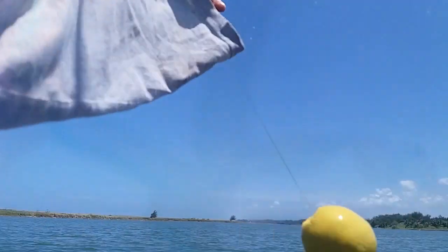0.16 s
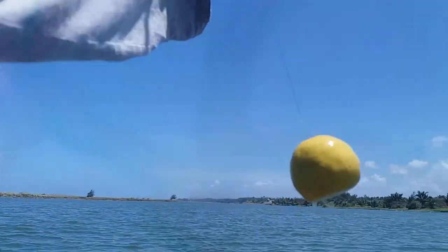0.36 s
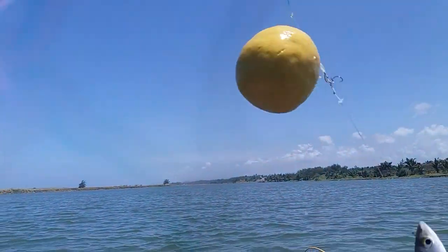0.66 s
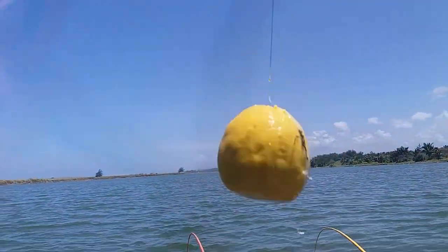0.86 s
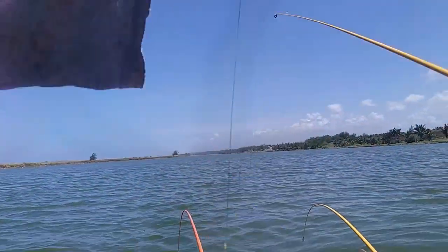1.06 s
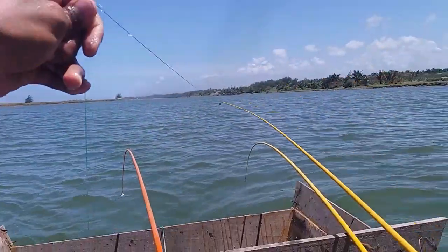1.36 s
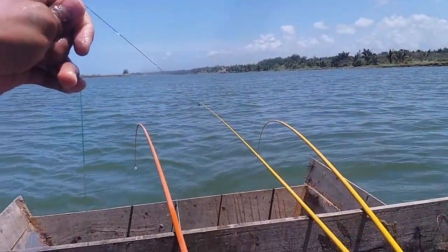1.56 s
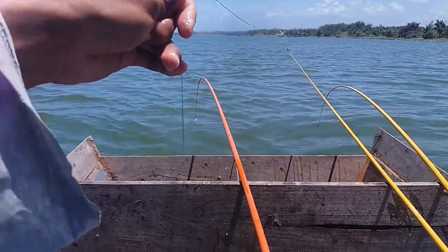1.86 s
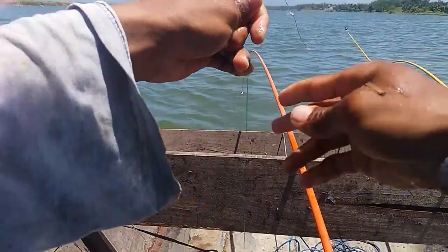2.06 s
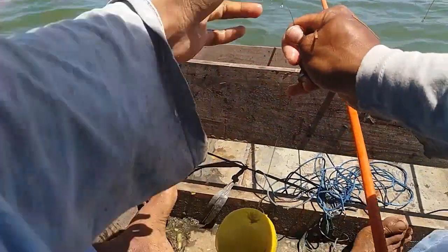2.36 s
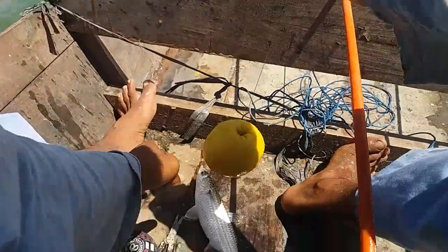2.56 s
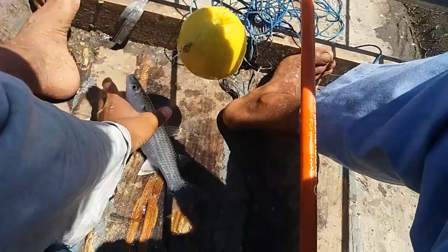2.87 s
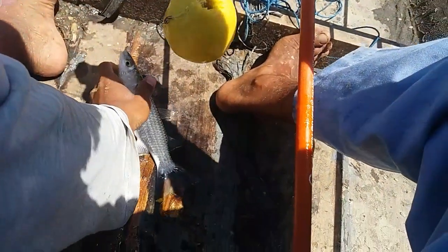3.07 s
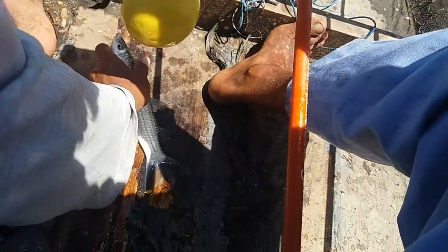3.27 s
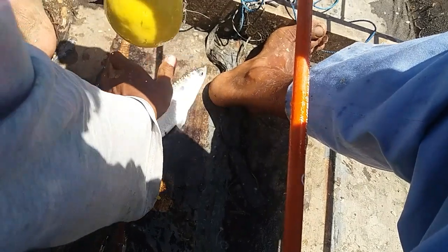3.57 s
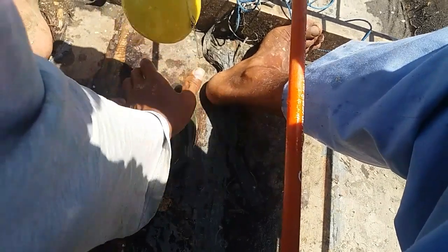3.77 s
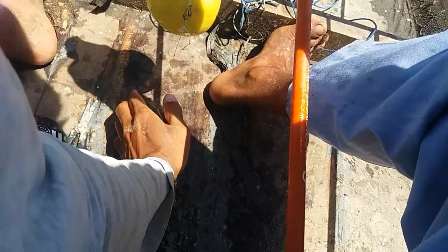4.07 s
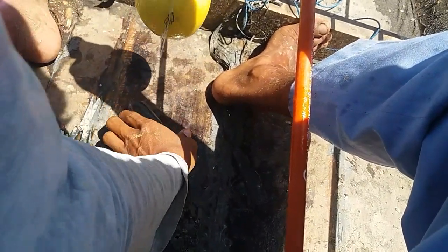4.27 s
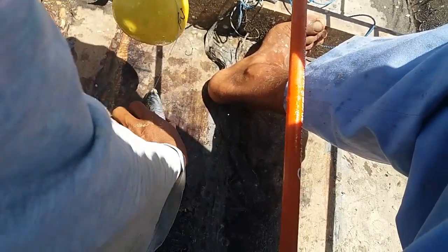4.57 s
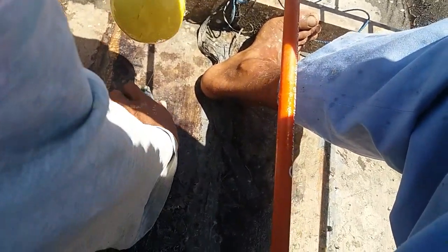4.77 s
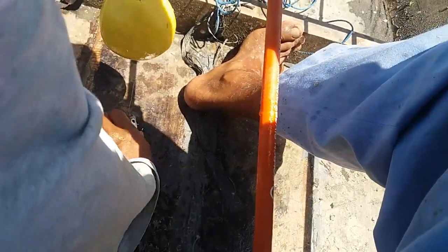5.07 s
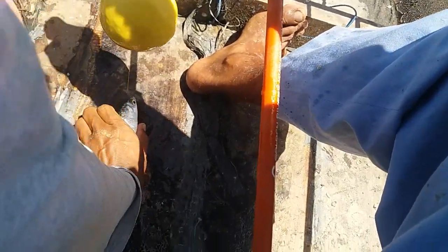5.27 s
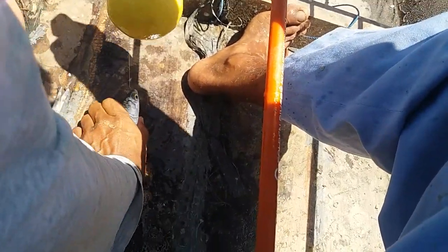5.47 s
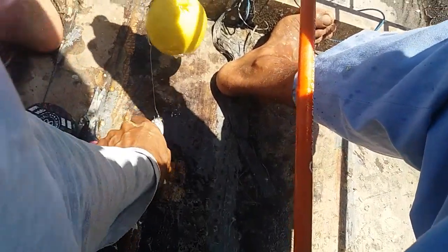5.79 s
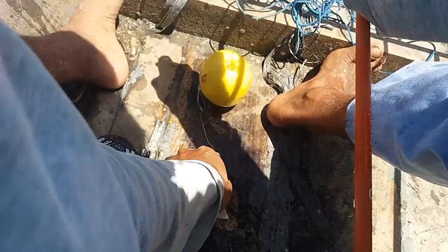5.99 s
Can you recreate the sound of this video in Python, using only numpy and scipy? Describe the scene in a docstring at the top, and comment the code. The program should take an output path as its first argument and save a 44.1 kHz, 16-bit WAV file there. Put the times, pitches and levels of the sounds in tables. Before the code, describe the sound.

Open air on a small wooden boat, heard close and without echo. A small engine ticks throughout, about nine tick-clacks a second, each gritty and slightly ringing, over low wavering rumble, soft wash and fine ripple hiss. Faint thin bird chips rise near 0.2, 1.4, 1.5 and 3.4 s. Dull low bumps push the hull, strongest at 0.9 and again at 2.0-2.1 s; wavelets slap and gurgle at 1.05, and a crisp smack rings the side boards at 1.7 s with spattering drops. After 2.8 s the ripple hiss drops as the microphone dips into the hull. At 3.45-3.7 s come wet clicks, woody knocks, one heavy thud and a cloth rustle. A smaller flurry of taps and splashes follows at 4.5 s. Slippery rubbing near 5.05 leads to the strongest deep thump at 5.2 s with gurgling, then wet crackles at 5.8-6 s.

```python
"""Fish on the deck of a small boat

A small wooden boat on open water: a fish is lifted aboard on a line and pinned to the wet deck.
Slaps and drops are noise clumps and tiny bubbles, gurgles are ringing air pockets, planks are struck modes.
Wet line and fish click and rub in grainy bursts; a sleeve rustles as crackling noise.
Behind: low rumble, wash, ripple hiss, an engine ticking about nine times a second, a tiny bird's rising
chips, and steady sines for the camera's faint whine."""
import sys
import numpy as np
from scipy import signal
from scipy.fft import rfft, irfft, next_fast_len
from scipy.io import wavfile
from scipy.ndimage import uniform_filter1d, map_coordinates

SR = 44100
rng = np.random.default_rng(int(sys.argv[2]) if len(sys.argv) > 2 else 0)


def wav_record(signal):
    """Record a signal, one row per channel, as 16-bit PCM in the file named by sys.argv[1]."""
    frames = np.transpose(np.atleast_2d(signal))
    bounded = np.clip(frames, -1, 1)
    # unit amplitude maps onto the largest positive 16-bit level
    quanta = np.round(bounded * 32767).astype(np.int16)
    wavfile.write(sys.argv[1], SR, quanta)


N = 270548  # length of the scene in samples
TIME = np.arange(N) / SR  # seconds into the scene
AGE = np.arange(SR // 3) / SR  # seconds into a single short sound

# wavelets slapping the side: (time [s], level [dB], brightness [dB per octave], t60 [s])
SLAPS = [(0.404, -37.5, -3.5, 0.12), (1.039, -33, -1, 0.098), (1.052, -32.5, -0.5, 0.14),
         (1.71, -29.5, 3, 0.079), (1.737, -32, 0.5, 0.19), (1.79, -37, 0, 0.18), (1.866, -36.5, 2, .12),
         (2.268, -39.5, -4.5, 0.2), (3.735, -37, -3, 0.29), (4.479, -34, 1, 0.19),
         (4.569, -34.5, -5, 0.073), (5.23, -30.5, -1.5, 0.21), (5.256, -35, 0, 0.12)]


def amp(db):
    """Decibels to gain."""
    return 10 ** (np.asarray(db) / 20)


def unit(x):
    """Scale to rms 1."""
    return x / np.sqrt(np.mean(x ** 2) + 1e-20)


def wobble(rate, size=N):
    """A smooth random curve through random knots, rate knots a second."""
    knots = rng.standard_normal(int(size * rate / SR) + 4)
    return map_coordinates(knots, [TIME[:size] * rate])


def noise(spectrum, size, tilt_db=0, grain_db=0):
    """Noise of rms 1 with a (Hz, dB) colour, tilted in dB per octave; grain_db breaks it into crackles."""
    grains = rng.standard_normal(size) * amp(grain_db * wobble(1400, size=size))
    octave = np.log2(np.fft.rfftfreq(size, 1 / SR) + 1)
    hz, db = np.transpose(spectrum)
    inside = np.clip(octave, np.log2(hz[0]), None)
    low_cut_db = 12 * (inside - octave)  # 12 dB per octave below the lowest listed pitch
    colour_db = np.interp(octave, np.log2(hz), db) + tilt_db * inside - low_cut_db
    return unit(irfft(rfft(grains) * amp(colour_db), size))


def patchy(x, depth_db):
    """Random gain in small patches of time and frequency, back at rms 1."""
    z = signal.stft(x, nperseg=512)[2]
    field = uniform_filter1d(rng.standard_normal(z.shape), size=4, axis=0)
    field = uniform_filter1d(field, size=6, axis=1)
    patched = signal.istft(z * amp(depth_db * unit(field)), nperseg=512)[1]
    return unit(patched[:N])


def fade(rise, t60):
    """A quick swell and an exponential decay."""
    return (1 - np.exp(-AGE / rise)) * np.exp(-np.log(1000) * AGE / t60)


def swell(peak):
    """A rounded burst that tops out at 1 after peak seconds."""
    return (AGE / peak * np.exp(1 - AGE / peak)) ** 2


def lingering(s, rise, fall):
    """An envelope over the whole scene that rises at s seconds and dies away (time constants in s)."""
    age = np.maximum(TIME - s, 0)
    return (1 - np.exp(-age / rise)) * np.exp(-age / fall)


def tone(hz):
    """A sine that follows a pitch curve."""
    return np.sin(2 * np.pi * np.cumsum(hz) / SR)


def ringing(modes):
    """Undamped (Hz, dB) modes of random phase, struck a little differently each time."""
    scatter_db = 1.8
    out = np.zeros(len(AGE))
    for hz, db in modes:
        gain = amp(db + scatter_db * rng.normal())
        out += gain * np.sin(2 * np.pi * (hz * AGE + rng.random()))
    return out


def crackle(rise, t60, tilt_db):
    """Wet surfaces parting: a grainy burst with a faint tail."""
    # colour of wet surfaces: (frequency [Hz], level per Hz [dB])
    wet_colour = [(400, -2), (1000, -3.5), (1800, -2), (4200, 3), (5800, -6.5), (7600, -6), (10000, -7),
                  (12500, -10), (14800, -11), (15700, -16), (17000, -40)]
    grains = noise(wet_colour, len(AGE), tilt_db, grain_db=5)
    return (fade(rise, t60) + 0.018 * fade(0.0021, 0.37)) * grains


def add(track, s, sound):
    """Mix a sound into the track at s seconds."""
    part = track[max(round(s * SR), 0):][:len(sound)]
    part += sound[:len(part)]


def shielded():
    """0 while the microphone faces the open water, 1 once it has dipped into the hull."""
    dip_s, dip_length_s = 2.82, 0.058  # when, and how gradually
    return .5 + .5 * np.tanh((TIME - dip_s) / dip_length_s)


def whine():
    """Thin steady tones of the camera's electronics, near the top of hearing."""
    # (frequency [Hz], level [dB])
    whine_tones = [(13000, -97), (14000, -87), (15000, -89)]
    start_s = .45
    tones = sum(amp(db) * unit(np.sin(2 * np.pi * hz * TIME)) for hz, db in whine_tones)
    return (TIME > start_s) * tones


def air():
    """A very faint, steady hiss, mostly high treble."""
    # (frequency [Hz], level per Hz [dB])
    air_colour = [(3000, -28), (6000, -12), (10000, 29), (12500, 0), (15500, 27)]
    return amp(-84) * noise(air_colour, N)


def rumble():
    """Low-pitched noise whose level wavers slowly."""
    # (frequency [Hz], level per Hz [dB])
    rumble_colour = [(25, -41), (45, -15), (68, -0.5), (105, 1), (160, -3.5), (250, -14), (400, -22.5),
                     (900, -59)]
    return amp(-38.5 + 1.0 * wobble(7.9)) * noise(rumble_colour, N)


def wash():
    """Unsteady, patchy noise of moving water; each slap stirs it up, then the water settles."""
    # (frequency [Hz], level per Hz [dB])
    wash_colour = [(150, 0), (350, -0.5), (600, -6), (1000, -11.5), (2000, -19), (3500, -25), (5000, -46.5)]
    calm_db, stir_db, settle_s = -53, -23, 0.27  # stir is relative to the slap; settle is a time constant
    stirred_power = sum((amp(db + stir_db) * lingering(s, 0.01, settle_s)) ** 2 for s, db, *_ in SLAPS)
    level = np.sqrt(amp(calm_db) ** 2 + stirred_power)
    return level * amp(1.6 * wobble(25)) * patchy(noise(wash_colour, N), depth_db=2.5)


def ripples():
    """Fine fluttering hiss that swells in puffs of breeze and is dulled in level by the sides of the boat."""
    # (frequency [Hz], level per Hz [dB])
    ripple_colour = [(1200, 9.5), (2500, 7), (3700, 3.5), (4700, 4.5), (5800, -6), (8000, -9.5),
                     (15000, -31)]
    # puffs of breeze: (time [s], swell [dB])
    gusts = [(.7, 5), (2.1, 6)]
    open_db, shield_db, flutter_db, gust_width_s = -66.5, 10, 1.1, 0.11
    gust_db = sum(db * np.exp(-((TIME - s) / gust_width_s) ** 2) for s, db in gusts)
    level_db = open_db + gust_db - shield_db * shielded() + flutter_db * wobble(99)
    return amp(level_db) * noise(ripple_colour, N, grain_db=3)


def bird():
    """Very short, thin chips that rise from 7000 towards 7900 Hz."""
    # (time [s], level [dB])
    chips = [(.163, -66), (1.355, -60), (1.549, -57), (3.372, -63)]
    out = np.zeros(N)
    for s, db in chips:
        add(out, s, amp(db) * swell(0.0022) * tone(7900 - 900 * np.exp(-AGE / 0.003)))
    return out


def engine_tick():
    """A short falling, rough tone with grit and a cluster of ringing modes."""
    # grit: (frequency [Hz], level per Hz [dB])
    grit_colour = [(500, 12), (900, 8.5), (1500, 2.5), (2200, -9), (3500, -23), (7000, -58)]
    # ringing of the tick: (frequency [Hz], level [dB])
    tick_modes = [(980, -18.5), (1520, -17.5), (2090, -26), (2950, -26.5)]
    start_hz, fall_hz, fall_s = 1872, 777, 0.0046
    scatter, roughness = .03, .07  # shares of the pitch
    pitch = start_hz - fall_hz * (1 - np.exp(-AGE / fall_s))
    pitch = pitch * (1 + scatter * rng.normal())
    rough_pitch = pitch * (1 + roughness * wobble(680, size=len(AGE)))
    body = amp(2) * swell(0.0029) ** 3 * tone(rough_pitch)
    grit = amp(-4.5) * swell(0.0037) * noise(grit_colour, len(AGE))
    return body + grit + ringing(tick_modes) * swell(0.0092)


def engine():
    """Each cycle gives a tick, then a gritty, ringing clack and a stray weak rattle of a loose part."""
    # (time [s], level [dB])
    engine_level = [(0, -46.5), (.55, -43.5), (1.6, -42), (3.0, -44.5), (4.1, -44.5), (4.75, -51.5),
                    (5.5, -47), (6.13, -45.5)]
    # grit of clack and rattle: (frequency [Hz], level per Hz [dB])
    clack_colour = [(400, 11), (1100, 9), (2200, 9), (3900, 0.5), (4700, -9), (8000, -22.5), (13000, -36)]
    # ringing of the clack: (frequency [Hz], level [dB])
    clack_modes = [(1620, -6), (2200, -11.5), (2820, -16.5), (3600, -22.5)]
    cycle_s, first_tick_s, jitter_s = .11177, .0315, .0006
    clack_lag_s, rattle_lag_s = .0245, (.04, 0.12)  # the rattle falls anywhere in its span
    clack_rel_db, shield_db, rattle_rel_db = -5, 1, -10.5  # clack against tick, loss in hull, rattle against clack
    dull_db = 3.5  # how much duller the clack is down in the hull (dB per octave)
    out = np.zeros(N)
    inside = shielded()
    tick_db = np.interp(TIME, *np.transpose(engine_level))
    clack_db = tick_db + clack_rel_db - shield_db * inside
    for beat in np.arange(first_tick_s, N / SR, cycle_s):
        i = int(beat * SR)
        s = beat + jitter_s * rng.normal()
        add(out, s, amp(tick_db[i] + .8 * rng.normal()) * engine_tick())
        tilt_db = dull_db * (.5 - inside[i])
        clack = noise(clack_colour, len(AGE), tilt_db, grain_db=4) + ringing(clack_modes)
        add(out, s + clack_lag_s, amp(clack_db[i] + 1.4 * rng.normal()) * swell(0.0056) * clack)
        rattle = swell(0.0029) * noise(clack_colour, len(AGE))
        rattle_db = clack_db[i] + rattle_rel_db + rng.normal(0, 2.6)
        add(out, s + rng.uniform(*rattle_lag_s), amp(rattle_db) * rattle)
    return out


def hull():
    """Soft bumps push the hull through a few low cycles whose pitch sags, with a dull noisy shudder."""
    # (time [s], level [dB], nominal pitch [Hz], length [s])
    bumps = [(0.531, -28, 130, 0.054), (.755, -26, 167, 0.024), (0.922, -19, 215, 0.049),
             (0.934, -14.5, 154.6, 0.067), (0.992, -25.5, 147, 0.067), (1.046, -23.5, 117, 0.058),
             (1.124, -26, 121, 0.084), (1.267, -25.5, 159, 0.075), (1.372, -30, 87.6, 0.091),
             (1.946, -28, 206, 0.036), (2.03, -20.5, 120, 0.05), (2.109, -18.5, 147, 0.008),
             (2.117, -17.5, 165, 0.011), (2.14, -26.5, 148, 0.078), (2.585, -23, 137, 0.053),
             (2.74, -26, 72.6, 0.025), (2.778, -26.5, 83, 0.024), (2.848, -28, 90, .03),
             (4.406, -25, 124, 0.028), (5.191, -27, 211, 0.047)]
    shudder_colour = [(70, 8.5), (220, 2.5), (380, -15.0), (700, -28.0), (2000, -56), (6000, -100)]
    out = np.zeros(N)
    for s, db, hz, length in bumps:
        push = tone(hz * (0.825 + 0.57 * np.exp(-AGE / 0.016)))
        shudder = noise(shudder_colour, len(AGE))
        add(out, s, amp(db) * swell(length / 4) * (0.7 * push + 0.43 * shudder))
    return out


def slaps():
    """Wavelets slap the side in clumps of grainy splashing noise."""
    # (frequency [Hz], level per Hz [dB])
    splash_colour = [(200, 8.5), (400, 8.5), (1000, -1.5), (1400, -13.5), (2200, -14), (4000, -25),
                     (7000, -42), (15000, -92)]
    out = np.zeros(N)
    for s, db, tilt_db, t60 in SLAPS:
        splash = noise(splash_colour, len(AGE), tilt_db, grain_db=4)
        add(out, s, amp(db) * fade(0.00079, t60) * splash)
    return out


def gurgles():
    """Trapped air rings unsteadily with a slightly rising pitch; small, high pockets die sooner."""
    # air pockets under the hull: (time [s], level before the common lift [dB], starting pitch [Hz])
    pockets = [(0.421, -38, 539), (1.071, -33, 803), (1.746, -31, 477), (1.802, -33, 1036),
               (1.877, -30.5, 613), (1.877, -38, 1060), (2.28, -33, 612), (2.833, -32, 1880),
               (3.019, -38, 572), (3.198, -28.5, 501), (3.253, -31, 994), (3.745, -34.5, 583),
               (3.914, -42, 465), (4.482, -31.5, 1880), (4.486, -37, 1150), (5.229, -28.5, 870),
               (5.235, -26, 490), (5.257, -30, 333), (5.272, -30.5, 517), (5.328, -34, 943),
               (5.917, -34, 455)]
    lift_db, cycles = 4.5, 51.3  # cycles rung within the t60
    out = np.zeros(N)
    for s, db, hz in pockets:
        pitch = hz * (1 + 0.62 * AGE + 0.055 * wobble(155, size=len(AGE)))
        churn_colour = [(hz / 2, -22), (hz, 0), (hz * 1.15, -2), (hz * 2, -24), (hz * 8, -60)]
        churn = noise(churn_colour, len(AGE))
        add(out, s, amp(db + lift_db) * fade(0.0059, cycles / hz) * (tone(pitch) + 0.15 * churn))
    return out


def droplets(centre_hz, spread, count):
    """A clump of tiny damped bubbles of scattered pitch, weakening over spread seconds."""
    cycles = 13.3  # cycles rung within the t60
    out = np.zeros(len(AGE))
    for late, pitch, size in rng.random((count, 3)):
        hz = centre_hz * 2 ** (1.6 * (pitch - .5))
        gain = 0.47 * (0.5 + size) * (1 - 0.69 * late)
        drop = np.sin(2 * np.pi * hz * AGE) * fade(0.00044, cycles / hz)
        add(out, spread * late, gain * drop)
    return out


def spatter():
    """Water squeezed or thrown off breaks into drops."""
    # (time [s], level [dB], centre pitch [Hz], length [s])
    spatters = [(1.053, -31.5, 2430, 0.024), (1.71, -33, 1490, .022), (1.746, -34, 850, 0.09),
                (3.016, -32.5, 1110, 0.026), (3.522, -38, 1400, 0.022), (4.480, -41, 1500, 0.013),
                (4.505, -44, 1180, .035), (4.562, -40, 1300, 0.024), (5.23, -39, 1550, 0.02),
                (5.251, -37.5, 1450, 0.017), (5.843, -36, 2540, 0.018)]
    out = np.zeros(N)
    for s, db, hz, length in spatters:
        add(out, s, amp(db) * droplets(hz, length, count=28))
    return out


def side_boards():
    """A hard smack starts with a crisp crack while the side boards ring on, each mode with its own decay."""
    # (time [s], level [dB], crack against ring [dB])
    smacks = [(1.7062, -30.5, 1), (1.7329, -35, -2)]
    # modes of the boards: (frequency [Hz], level [dB], t60 [s])
    board_modes = [(473, -10, .07), (805, -4, .08), (1010, -8, 0.14), (1530, -8, 0.14), (1846, -9, 0.096),
                   (2100, -6, 0.064), (2530, -10, .04)]
    out = np.zeros(N)
    for s, db, crack_db in smacks:
        ring = np.zeros(len(AGE))
        for hz, mode_db, t60 in board_modes:
            pitch = hz * (1 + 0.028 * wobble(410, size=len(AGE)))
            ring += amp(mode_db) * fade(0.0027, t60) * tone(pitch)
        crack = amp(crack_db) * crackle(.0003, t60=0.028, tilt_db=-8)
        add(out, s, amp(db) * (ring + crack))
    return out


def sleeve():
    """Cloth slides in fine grains as the arm moves."""
    # (time [s], level [dB])
    strokes = [(3.459, -53.5), (4.965, -55), (5.834, -53), (5.93, -67), (6.07, -56.5)]
    # (frequency [Hz], level per Hz [dB])
    cloth_colour = [(600, 19), (2000, 7), (4000, 4.5), (6000, -5.5), (10000, -8), (13000, -19),
                    (16000, -15)]
    sliding = sum(amp(db) * lingering(s, rise=0.0048, fall=0.19) for s, db in strokes)
    return sliding * amp(3.8 * wobble(70)) * noise(cloth_colour, N, grain_db=2.5)


def rubs():
    """Wet fingers stick and slip along line and fish, so the crackle flutters."""
    # (time [s], level [dB], rise [s], t60 [s], brightness [dB per octave])
    rub_strokes = [(4.474, -40.5, 0.0049, .06, 4), (4.992, -43, .003, .05, -9),
                   (5.051, -36.5, 0.0036, 0.057, -7.5), (5.067, -34, 0.0053, 0.13, -8),
                   (5.166, -41, .002, .03, -4), (5.188, -37.5, .001, 0.027, -5.5),
                   (5.439, -46, 0.0024, 0.057, -5), (5.837, -45, 0.0057, 0.11, -3.5)]
    slip_db, slips_per_s = 4, 420
    out = np.zeros(N)
    for s, db, rise, t60, tilt_db in rub_strokes:
        slips = unit(amp(slip_db * wobble(slips_per_s, size=len(AGE))))
        add(out, s, amp(db) * slips * crackle(rise, t60, tilt_db))
    return out


def clicks():
    """Wet line and scales give short crackles, each with its own unsteady ring."""
    # (time [s], level [dB], brightness [dB per octave], ringing pitch [Hz], t60 [s])
    wet_clicks = [(1.416, -39, -1, 7170, 0.021), (3.4654, -31, 1.5, 3170, 0.026),
                  (3.484, -40, -2, 4200, 0.018), (3.526, -36, -1.5, 3770, 0.023),
                  (3.546, -39, 5, 4130, 0.016), (3.6432, -25.5, 1.5, 9860, 0.019),
                  (3.643, -29.5, -7.5, 7400, 0.023), (3.715, -38.5, -3, 7600, 0.025),
                  (3.971, -44.5, 0, 4970, 0.03), (4.067, -35.5, -6.5, 2650, 0.017),
                  (4.2933, -37, -2, 4300, 0.022), (4.468, -39.5, -4, 2960, 0.033),
                  (4.554, -41, -7.5, 2670, .028), (4.5674, -33, 3.5, 4660, 0.03),
                  (4.57, -33, 5, 14900, 0.021), (4.972, -47, -3, 11100, .015),
                  (5.005, -45, -13, 3300, .012), (5.055, -42, -11, 3900, 0.048),
                  (5.0819, -32, -5.5, 3000, 0.018), (5.161, -40.5, -6, 2800, 0.031),
                  (5.825, -37.5, -5.5, 3020, 0.035), (5.839, -30, -6, 2885, 0.05),
                  (5.887, -39, -9, 2500, .028), (5.957, -34, -7, 1740, 0.025)]
    rise_s, ring_db = 0.0014, -2
    out = np.zeros(N)
    for s, db, tilt_db, hz, t60 in wet_clicks:
        ring = amp(ring_db) * tone(hz * (1 + 0.062 * wobble(1000, size=len(AGE))))
        add(out, s, amp(db) * (crackle(rise_s, t60, tilt_db) + fade(rise_s, t60) * ring))
    return out


def deck():
    """Fish and hand strike the planks, which ring briefly; a softer contact weakens the upper modes."""
    # (time [s], level [dB], contact time [s], t60 [s], pitch ratio of the spot struck)
    knocks = [(2.118, -25.5, 0.0013, 0.033, 1.02), (3.468, -20, 0.000071, 0.038, 1.13),
              (3.548, -17, 0.00079, 0.031, 0.97), (3.555, -9.5, 0.0059, 0.062, 0.96),
              (3.647, -26.5, 0.00086, 0.097, 1), (3.863, -30.5, 0.0011, 0.06, 1.04),
              (4.478, -20.5, 0.0014, 0.029, 0.54), (4.484, -23, 0.00071, 0.052, 1.096),
              (4.500, -22.5, 0.0027, 0.07, 0.99), (4.516, -32, 0.0014, 0.1, 1),
              (4.5531, -22, 0.00055, 0.021, 1.55), (4.561, -23.5, 0.0022, 0.066, 0.976),
              (4.585, -34, 0.0012, 0.035, 1.36), (5.19, -6.5, 0.0062, 0.072, 0.98),
              (5.243, -22, 0.00087, 0.031, 1.08), (5.259, -18, 0.0025, 0.05, 0.72),
              (5.956, -29, 0.00027, 0.028, 0.76)]
    # modes of a plank: (frequency at pitch ratio 1 [Hz], level [dB], share of the knock's t60)
    plank_modes = [(395, -0.5, 1), (526, 0, 0.47), (827, 0, 0.18), (1140, -40, 0.16), (1820, -32, 0.8)]
    lowest_hz = plank_modes[0][0]
    out = np.zeros(N)
    for s, db, contact, t60, ratio in knocks:
        for hz, mode_db, share in plank_modes:
            softness = np.hypot(1, lowest_hz * contact * 2) / np.hypot(1, hz * contact * 2)
            pitch = hz * ratio * (1 + 0.023 * rng.normal())
            ring = np.sin(2 * np.pi * pitch * AGE) * fade(2 * contact, t60 * share)
            add(out, s, amp(db + mode_db + rng.normal(0, 1)) * softness * ring)
    return out


def scene():
    """Everything in open air, with no room around it."""
    background = air() + rumble() + wash() + ripples() + bird() + engine()
    boat_and_water = hull() + slaps() + gurgles() + spatter() + side_boards()
    fish_on_deck = sleeve() + rubs() + clicks() + deck()
    return (background + boat_and_water + fish_on_deck)[None]


def record(dry):
    """The camera adds its whine, cuts the deepest bass and keeps nothing above its band limit."""
    bass_cut_hz, top_hz = 44, 15900
    bass_cut = signal.butter(4, bass_cut_hz, "highpass", fs=SR, output="sos")
    thinned = signal.sosfilt(bass_cut, dry + whine())
    size = next_fast_len(N + SR // 2)
    kept = np.fft.rfftfreq(size, 1 / SR) < top_hz
    return irfft(rfft(thinned, size) * kept, size)[:, :N]


dry = scene()
out = record(dry)
wav_record(out)
```